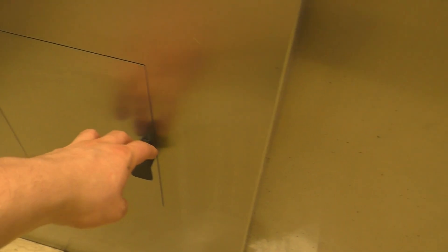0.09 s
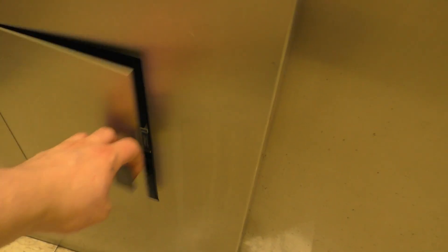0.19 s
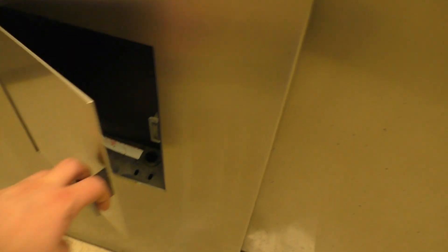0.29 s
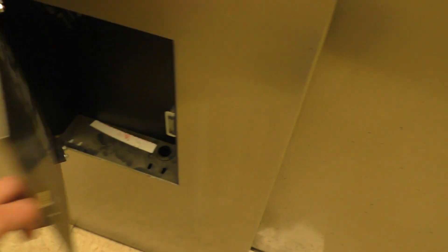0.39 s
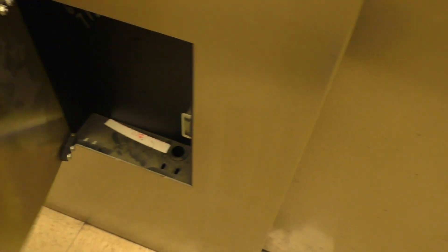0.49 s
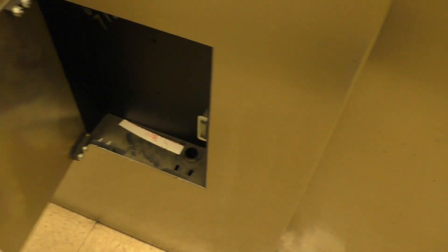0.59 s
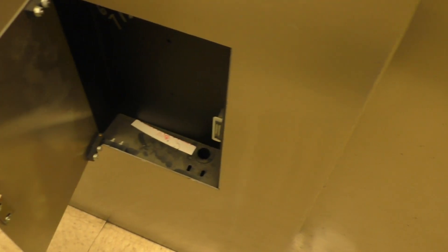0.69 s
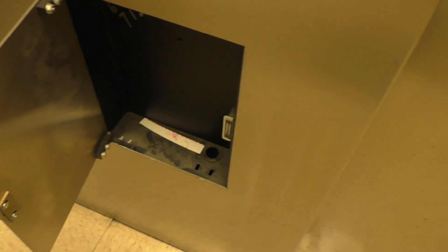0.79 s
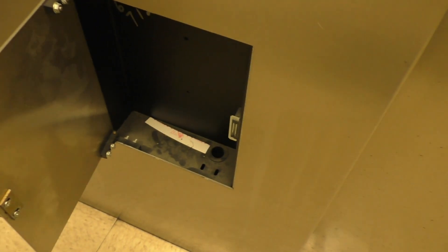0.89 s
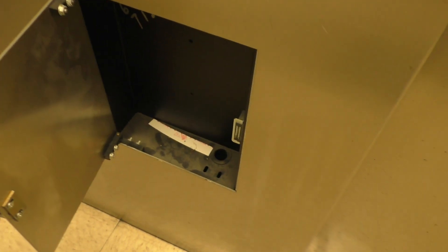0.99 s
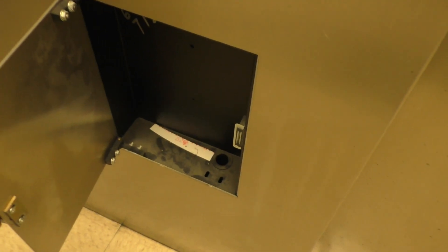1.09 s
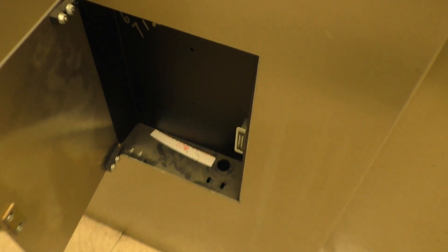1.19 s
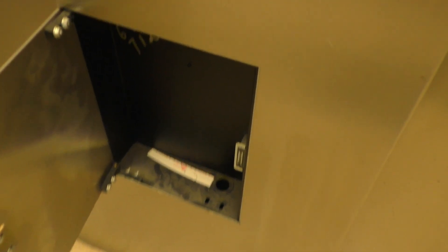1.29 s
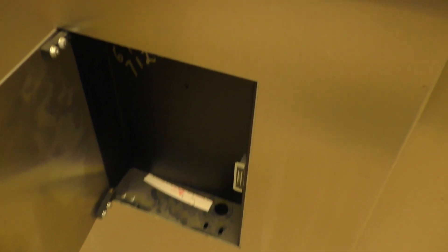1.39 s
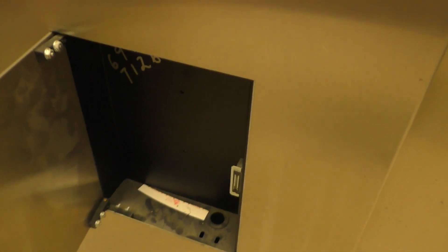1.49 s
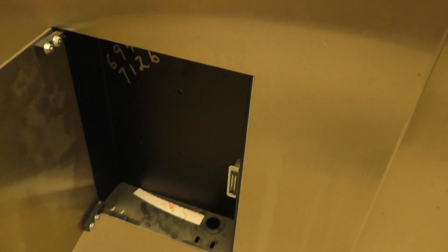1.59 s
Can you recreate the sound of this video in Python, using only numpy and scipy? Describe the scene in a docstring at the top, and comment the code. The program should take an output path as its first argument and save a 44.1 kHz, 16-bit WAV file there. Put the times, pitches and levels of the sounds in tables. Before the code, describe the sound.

Faint finger rubbing and a small tick, then a metal hatch door releases with a loud boom, swings round and slaps the steel wall with a bright click, ringing away over quiet rumble, heard close in stereo.

```python
"""A sheet-steel hatch is pulled open by hand, in stereo from inside a small steel-lined elevator car: the catch
ticks, lets go and the hatch booms, then swings round, clicks and slaps the wall panel.
Each sheet is shaped noise for its dense upper modes plus wavering sines for its strongest ones.
Ticks are noise cracks with ringing answers, with sines for the handle; thuds are short tones with puffs of noise.
Fingers rub the steel at first; shaft rumble, fan lines and hiss lie beneath."""
import sys
import numpy as np
from scipy import signal
from scipy.fft import rfft, irfft, next_fast_len
from scipy.io import wavfile
from scipy.ndimage import map_coordinates

SR = 44100
rng = np.random.default_rng(int(sys.argv[2]) if len(sys.argv) > 2 else 0)


def put_to_file(sound):
    """Save the sound as 16-bit audio at rate SR, in the file named by the first command-line argument."""
    columns = np.atleast_2d(sound).T  # one column per channel
    safe = np.clip(columns, -1, 1)
    whole_steps = np.round(safe * 32767)
    wavfile.write(sys.argv[1], SR, whole_steps.astype(np.int16))


def magnitude_from_level(level_db):
    """Linear magnitude for a level in decibels (20 dB per decade)."""
    exponent = np.asarray(level_db, float) / 20
    return 10 ** exponent


N = 70560
TIME_S = np.arange(N) / SR
WAVER_RAD = 0.5  # phase waver of the single modes and fan lines


def unit(x):
    """Scales a signal to rms 1."""
    return x / np.sqrt(np.mean(x ** 2) + 1e-20)


def along(points, hz):
    """Reads (freq_hz, value) points along a log frequency axis."""
    point_hz, value = np.transpose(points)
    return np.interp(np.log(hz + 1), np.log(point_hz + 1), value)


def curve(rows):
    """Joins (time_s, value) rows by straight lines, one value per sample."""
    time_s, value = np.transpose(rows)
    return np.interp(TIME_S, time_s, value)


def wobble(rate):
    """A smooth random curve through normal draws, rate knots a second."""
    knots = rng.standard_normal(int(N * rate / SR) + 4)
    return map_coordinates(knots, [np.arange(N) * rate / SR])


def filtered(x, response):
    """Multiplies the spectrum of x by a response of frequency."""
    m = next_fast_len(N + 8192)
    return irfft(rfft(x, m) * response(np.fft.rfftfreq(m, 1 / SR)), m)[..., :N]


def half_angle(alike, hz):
    """Half the phase angle whose cosine is the left-right likeness."""
    return np.arccos(np.clip(along(alike, hz), -1, 1)) / 2


def rush(colour, alike):
    """Coloured stereo noise of rms 1; the mid/side balance sets how alike the channels are."""
    def mid_side_gain(hz):
        angle = half_angle(alike, hz)
        return magnitude_from_level(along(colour, hz)) * [np.cos(angle), np.sin(angle)]

    mid, side = filtered(rng.standard_normal((2, N)), mid_side_gain)
    return unit(np.array([mid + side, mid - side]))


# how alike left and right are in the contact sounds: (freq_hz, likeness 0 to 1)
HIT_ALIKE = [(80, 1), (270, 0.05), (550, 0.77), (1650, .8), (5000, 0.51), (15000, 0.384)]


def clang(start_s, held_s, colour, t60):
    """Many close modes of steel: noise with random spectral peaks, held, then dying band by band."""
    rise_s, chatter_db, chatter_rate = 0.003, 3, 170  # loose steel chatters: depth, knots a second
    peaky_db, peak_width_hz = 4, 14
    hz, t, spectrum = signal.stft(rush([(1000, 0)], HIT_ALIKE), SR, nperseg=256)
    ringing_s = np.clip(t - start_s - held_s, 0, None)
    decay = magnitude_from_level(-60 * ringing_s / along(t60, hz)[:, None])
    ringing = signal.istft(spectrum * decay, SR, nperseg=256)[1][:, :N]
    peaks = rng.standard_normal(int(SR / 2 / peak_width_hz) + 2)

    def gain(hz):
        peak_db = peaky_db * np.interp(hz / peak_width_hz, np.arange(len(peaks)), peaks)
        return magnitude_from_level(along(colour, hz) + peak_db)

    size = np.sqrt(np.mean(gain(np.arange(SR / 2)) ** 2))
    chattering = ringing * magnitude_from_level(chatter_db * wobble(chatter_rate))
    onset = 1 - np.exp(-np.clip(TIME_S - start_s, 0, None) / rise_s)
    return filtered(chattering, gain) / size * onset


def ring(start_s, held_s, modes, rise_s):
    """Single modes of steel: decaying sines that waver, with a phase lag between the channels."""
    waver_db, waver_knee_hz = 3.3, 400
    t = np.clip(TIME_S - start_s, 0, None)
    power = sum(magnitude_from_level(db) ** 2 / 2 for hz, db, t60 in modes)
    out = 0
    for hz, db, t60 in modes:
        lag = half_angle(HIT_ALIKE, hz) * rng.choice([-1, 1])
        rate = 15 * np.sqrt(1 + hz / waver_knee_hz)  # higher modes waver faster
        phase = 2 * np.pi * hz * t + rng.uniform(0, 2 * np.pi) + WAVER_RAD * wobble(rate)
        phase = phase + lag * np.array([[1], [-1]])
        level_db = db + waver_db * wobble(rate) - 60 * np.clip(t - held_s, 0, None) / t60
        out = out + magnitude_from_level(level_db) * np.sin(phase)
    return out / np.sqrt(power) * (1 - np.exp(-t / rise_s))


def sheet(blows, modes, modes_db, colour, t60):
    """A struck steel sheet: clang plus its strongest modes, radiating little below the lowest."""
    lowest_hz = 65
    out = 0
    for start_s, db, held_s in blows:
        dense = clang(start_s, held_s, colour, t60)
        single = ring(start_s, held_s, modes, rise_s=0.011)
        out = out + magnitude_from_level(db) * (dense + magnitude_from_level(modes_db) * single)
    return filtered(out, lambda hz: (1j * hz / (lowest_hz + 1j * hz)) ** 2)


# fingers on the steel, ending at the last row: (time_s, level_db)
RUB = [(0, -50), (.2, -48.5), (.23, -42), (.26, -75.5)]
# spectrum of the rub: (freq_hz, relative_level_db)
RUB_COLOUR = [(120, -42.5), (220, -11), (600, -7.5), (2500, -16.5), (4000, -21.5), (9000, -28.5),
              (15500, -39.5)]


def rub():
    """Fingers work at the handle: friction as coloured noise of wavering level."""
    rubbing = TIME_S < RUB[-1][0]
    return magnitude_from_level(curve(RUB) + 0.85 * wobble(39.0)) * rubbing * rush(RUB_COLOUR, HIT_ALIKE)


# spectrum of the shaft rumble: (freq_hz, relative_level_db)
RUMBLE = [(12, -29), (20, 2.5), (36, -6.5), (82, -5), (122, -8.5), (151, -9.5), (255, -16), (1500, -38.5),
          (1950, -100)]
# rumble before waver and pan: (time_s, level_db)
RUMBLE_LEVEL = [(0, -51.5), (.3, -32), (.9, -49.5), (1.2, -50), (1.6, -50)]
# spectrum of the hiss: (freq_hz, relative_level_db)
HISS = [(470, -38.5), (800, -12.5), (1540, -8), (11400, -16), (15900, -13), (16150, -58.5)]
# hiss before the pan: (time_s, level_db)
HISS_LEVEL = [(0, -56.5), (1.1, -68), (1.6, -64)]
# fan lines before waver and pan: (freq_hz, peak_level_db)
HUM = [(360, -62.5), (10966, -78), (11693, -80.5)]
# how alike left and right are in rumble and hiss: (freq_hz, likeness 0 to 1)
AIR_ALIKE = [(40, 0.15), (240, 0.74), (3770, 0.45), (15000, 0.11)]


def air():
    """Shaft rumble and hiss as coloured noise, fan lines as wavering sines, all a little to the right."""
    left_over_right_db = -2
    low = magnitude_from_level(curve(RUMBLE_LEVEL) + 1.1 * wobble(7.6)) * rush(RUMBLE, AIR_ALIKE)
    hiss = magnitude_from_level(curve(HISS_LEVEL)) * rush(HISS, AIR_ALIKE)
    hum = 0
    for hz, db in HUM:
        level = magnitude_from_level(db + 1 * wobble(4.4))
        hum = hum + level * np.sin(2 * np.pi * hz * TIME_S + WAVER_RAD * wobble(16.0))
    return (low + hiss + hum) * magnitude_from_level([[left_over_right_db / 2], [-left_over_right_db / 2]])


# catch and handle contacts: (start_s, crack_level_db, car_answer_level_db, brightness_db_per_octave)
TICKS = [(0.1095, -29, -42.5, 1), (0.2322, -22.5, -30, 0), (0.366, -37.5, -45, 7), (0.5789, -21.5, -35, -2),
         (.613, -23, -39.5, -11), (0.8857, -52.5, -65.5, -5)]
# the crack before brightness: (freq_hz, relative_level_db)
TICK_CRACK = [(700, -44.5), (1300, -19), (3400, 2), (5000, -5), (6400, -6), (10000, -10), (15500, -28.5),
              (16500, -62.5)]
# the car's answer before brightness: (freq_hz, relative_level_db)
TICK_RING = [(800, -46.5), (1300, -2.5), (2600, -6), (4100, -7.5), (5200, -13.5), (6800, -10.5), (8000, -9),
             (10500, -19), (15800, -43)]
# decay of the car's answer: (freq_hz, t60_s)
RING_T60 = [(1200, 0.23), (4000, 0.65), (14000, 0.25)]
# the handle strikes the wall and bounces: (start_s, level_db)
HANDLE_HITS = [(0.579, -27.5), (0.613, -43)]
# single modes of the handle: (pitch_hz, relative_level_db, t60_s)
HANDLE = [(2729, -2, .33), (3430, 3, .07), (4030, -8, .3), (4300, -11, .45), (5566, -7, .33),
          (6300, 2, .05)]


def tilted(colour, db_per_octave):
    """Tilts a spectrum about 4 kHz."""
    return [(hz, level + db_per_octave * np.log2(hz / 4000)) for hz, level in colour]


def ticks():
    """Small metal contacts: a noise crack and the car's ringing answer; the handle rings when it strikes."""
    rise_s, crack_t60_s = 0.001, 0.017
    out = sum(magnitude_from_level(db) * ring(start_s, 0, HANDLE, rise_s) for start_s, db in HANDLE_HITS)
    for start_s, crack_db, answer_db, bright_db in TICKS:
        t = TIME_S - start_s
        envelope = magnitude_from_level(crack_db - 60 * np.abs(t) / crack_t60_s) * np.clip(t / rise_s, 0, 1)
        crack = rush(tilted(TICK_CRACK, bright_db), [(1000, 0.93)]) * envelope
        answer = clang(start_s, 0, tilted(TICK_RING, bright_db / 2), RING_T60)  # tilts half as much
        out = out + crack + magnitude_from_level(answer_db) * answer
    return out


# soft thuds: (start_s, tone_peak_level_db, settled_pitch_hz, t60_s)
THUDS = [(.112, -38, 200, 0.5), (0.221, -32, 520, .1), (.366, -30, 70, 0.45), (1.077, -55, 815, 0.2),
         (1.139, -51, 900, 0.03), (1.155, -43, 90, .1), (1.406, -35, 80, 0.07), (1.518, -47, 105, 0.23)]


def thuds():
    """Dull knocks that start within one cycle: a tone, sagging if low, and a puff of noise around it."""
    sag_share, sag_s, puff_db, lag_rad = 0.4, 0.02, -13, 0.6
    out = 0
    for start_s, db, hz, t60 in THUDS:
        t = np.clip(TIME_S - start_s, 0, None)
        # below 300 Hz the pitch starts sharp by sag_share and settles
        cycles = hz * (t + sag_share * sag_s * (hz < 300) * (1 - np.exp(-t / sag_s)))
        tone = np.sin(2 * np.pi * cycles + [[0], [rng.normal(0, lag_rad)]])
        puff_colour = [(hz / 2, -30), (hz, 0), (2 * hz, -14), (10 * hz, -120)]
        puff = magnitude_from_level(puff_db) * rush(puff_colour, HIT_ALIKE)
        out = out + magnitude_from_level(db - 60 * t / t60) * np.clip(2 * hz * t, 0, 1) * (tone + puff)
    return out


# blows on the hatch: (start_s, level_db, time the sheet keeps being shaken held_s)
BOOMS = [(.2322, -17.5, 0.042), (.366, -26.5, 0.0042)]
# strongest modes of the hatch: (pitch_hz, relative_level_db, t60_s)
HATCH = [(112.38, -5.5, 1.03), (250.2, -10.5, 0.96), (282, 1, 0.91), (462, -2.5, 0.37), (514, -10.5, 1.18),
         (670.4, -4, 0.37), (693.5, 1, 0.3), (804, -8, 0.86), (1006, -8, 0.62), (1129, -11, 0.63),
         (1270, -10, 0.7)]
# dense upper modes of the hatch: (freq_hz, relative_level_db_per_hz)
HATCH_CLANG = [(55, -50.5), (100, -17.5), (170, -2), (370, -7), (680, 0.5), (1300, -9.5), (2700, -17),
               (9000, -37.5), (13500, -43), (16000, -75)]
# decay of those dense modes: (freq_hz, t60_s)
HATCH_T60 = [(100, 1), (700, 1), (2000, 0.43), (6000, .45), (14000, 0.26)]


def hatch():
    """The sheet-steel hatch booms as it is let go, its single modes set over the clang."""
    return sheet(BOOMS, HATCH, 2, HATCH_CLANG, HATCH_T60)


# blows on the wall panel: (start_s, level_db, time the sheet keeps being shaken held_s)
SLAPS = [(.612, -30.5, 0.0099)]
# strongest modes of the wall panel: (pitch_hz, relative_level_db, t60_s)
WALL = [(184.4, 2.5, 0.75), (297, -9, 0.92), (489, -3.5, 0.97), (791, -9, 0.98), (1410, -19, 0.27),
        (1697, -5.5, 0.54)]
# dense upper modes of the wall panel: (freq_hz, relative_level_db_per_hz)
WALL_CLANG = [(50, -29), (140, 1), (190, -4.5), (1100, -11), (2800, -16), (8000, -36), (15000, -81.5)]
# decay of those dense modes: (freq_hz, t60_s)
WALL_T60 = [(100, 0.51), (700, 0.83), (2000, 0.61), (6000, 0.44), (14000, 0.29)]


def wall():
    """The steel wall panel rings when slapped, its single modes set just under the clang."""
    return sheet(SLAPS, WALL, -1.5, WALL_CLANG, WALL_T60)


def scene():
    """Sums the sources heard inside the car."""
    return hatch() + wall() + ticks() + thuds() + rub() + air()


def band_limit(x):
    """A steep low-pass at the top of the band."""
    return signal.sosfilt(signal.butter(12, 16640, fs=SR, output="sos"), x)


def record(dry):
    """Takes the stereo mix at its finished level."""
    return band_limit(dry)


dry = scene()
out = record(dry)
put_to_file(out)
```